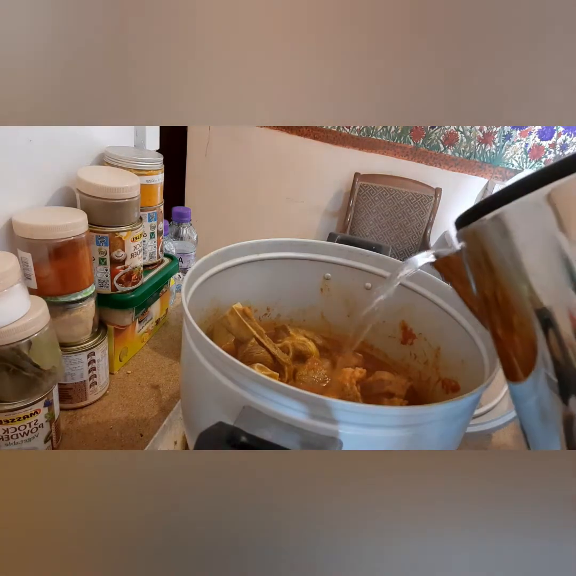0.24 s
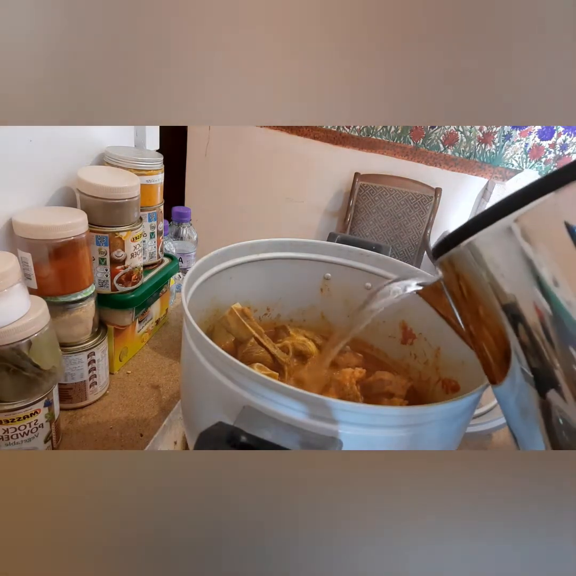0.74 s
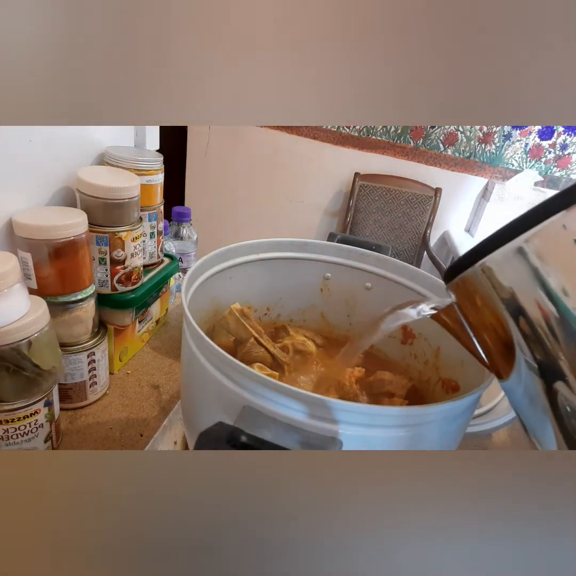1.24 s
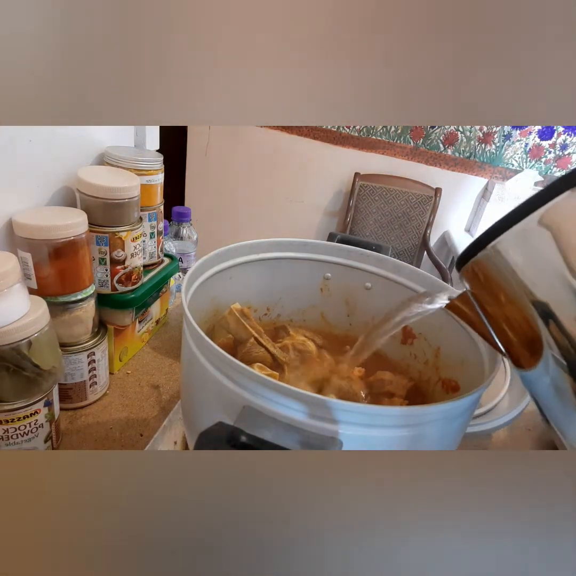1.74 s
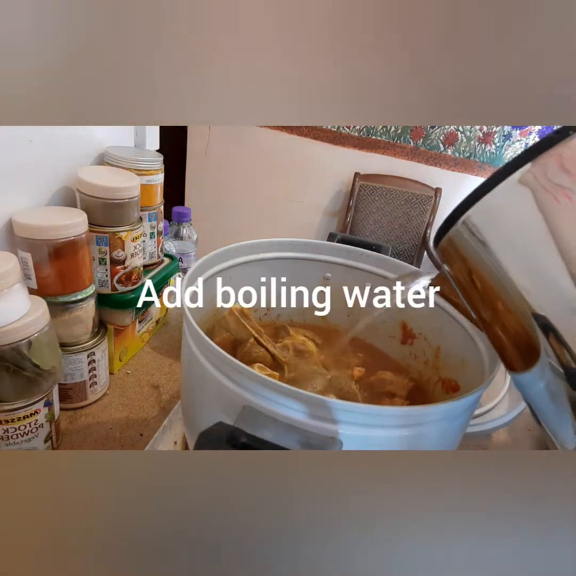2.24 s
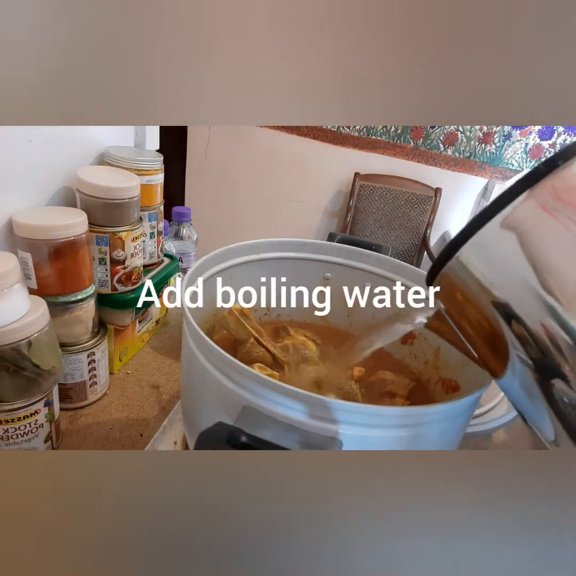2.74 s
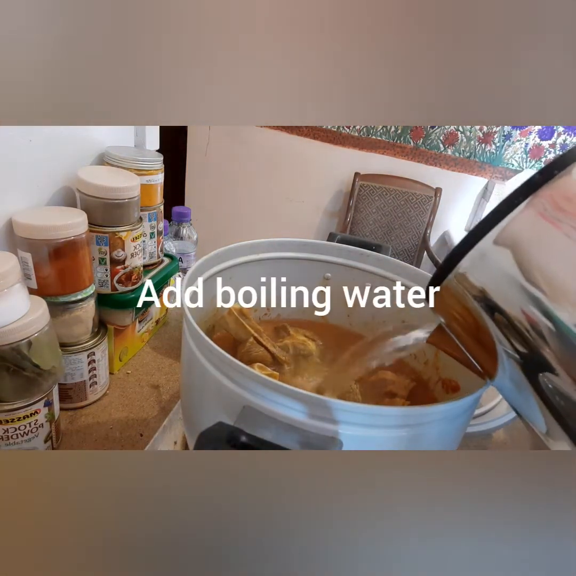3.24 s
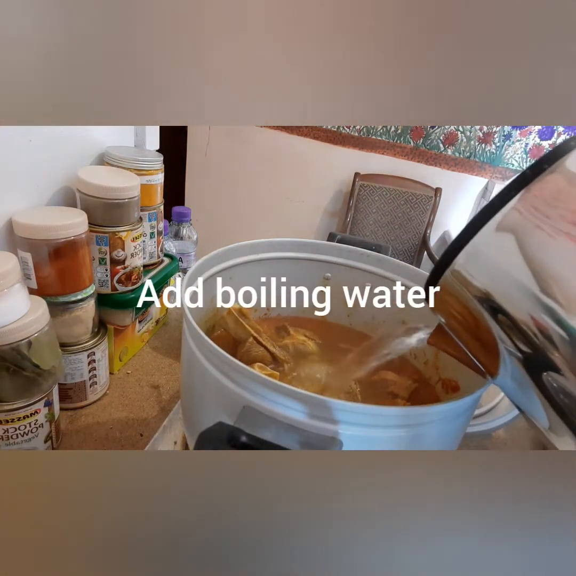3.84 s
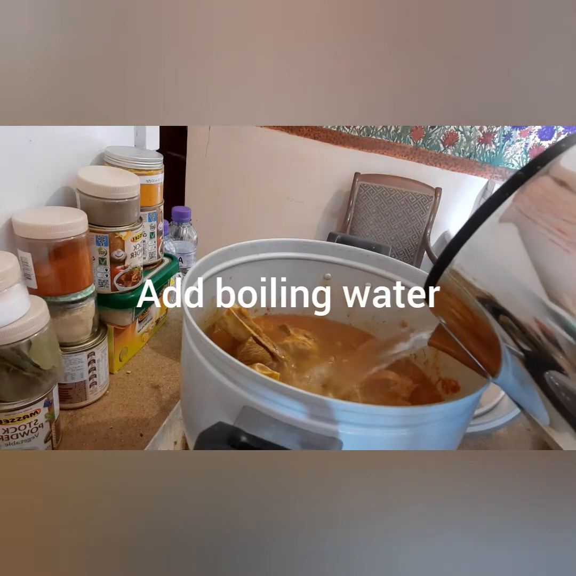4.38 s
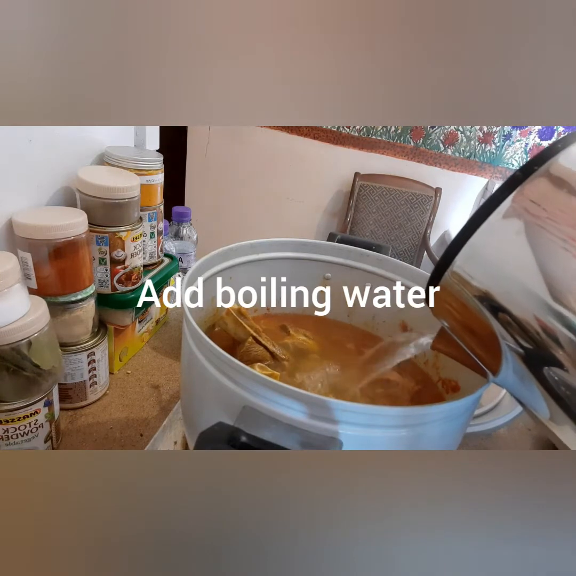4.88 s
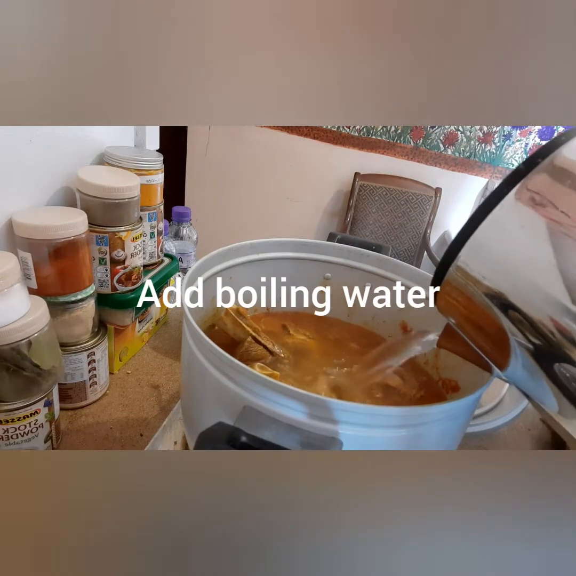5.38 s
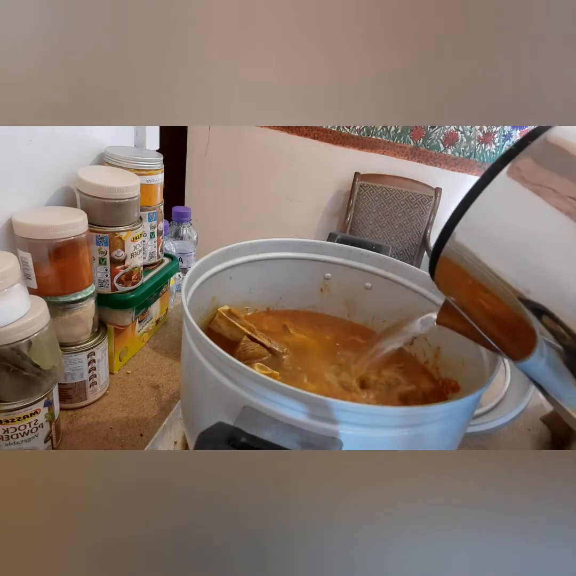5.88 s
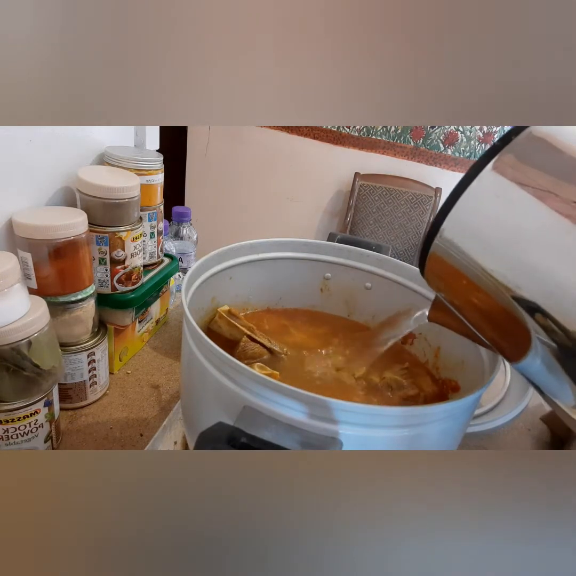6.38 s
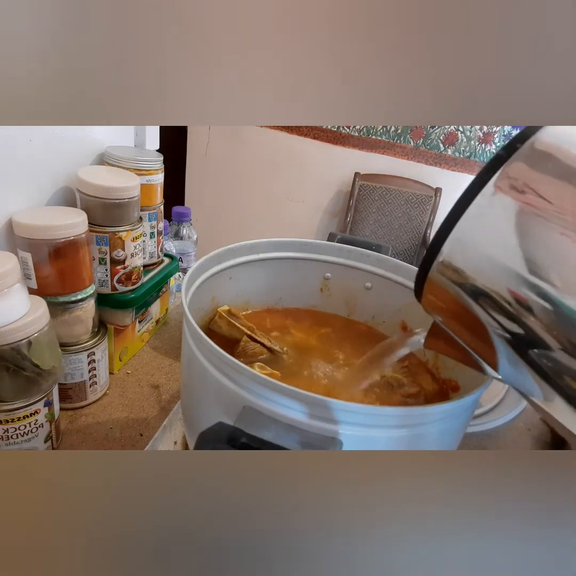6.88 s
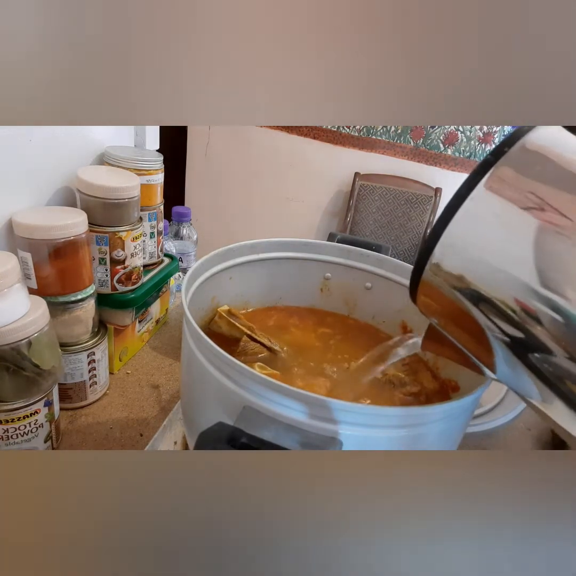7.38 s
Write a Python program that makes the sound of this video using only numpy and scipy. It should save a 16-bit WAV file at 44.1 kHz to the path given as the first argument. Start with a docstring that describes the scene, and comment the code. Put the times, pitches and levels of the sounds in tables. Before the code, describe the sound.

A kettle pours hot water into a wide metal pot of stew, heard very close in stereo in a quiet room with a faint low hush. It opens with a light trickle, and by 0.4 s the stream lands in full with hollow, throaty glugs and a fine hiss, bubbling busily until about 1.7 s. From 1.8 to 2.8 s bright, crisp splashes and spray come to the front. At about 2.9 s a single short, dull knock sounds on the worktop, with deep soft glugs around it until 3.5 s. The pour continues unbroken, with rounded gurgles around 3.6 and 4.5 s and ringing plips. After 5 s the low gurgling thins as the pot fills, leaving a lighter, higher trickle with scattered drips. Spray fades towards the end, though a sharp splash stands out at 7.5 s, the water still running.

```python
"""Gurgling and fine spray over kitchen hush: hot water pours from a kettle into a wide pot of stew.
The stream is swarms of dying, rising sines plus hiss, most of them heard through the pot's resonances.
Glugs and sharp splashes are single bubbles with a noise crack; one knock rings the worktop's modes.
Two ports close by hear the water, with reflections that change as its landing spot wanders."""
import sys
import numpy as np
from scipy import signal
from scipy.fft import rfft, irfft
from scipy.io import wavfile
from scipy.ndimage import uniform_filter1d

SR = 44100
rng = np.random.default_rng(int(sys.argv[2]) if len(sys.argv) > 2 else 0)


def persist_wave(psi):
    """Save psi, clipped to +-1, as 16-bit WAV."""
    counts = np.round(np.clip(psi, -1, 1) * 32767).astype(np.int16)
    wavfile.write(sys.argv[1], SR, np.atleast_2d(counts).T)


N = 336042
T = np.arange(N) / SR
HZ = np.fft.rfftfreq(N, 1 / SR)

# kitchen hush, spectrum shape: (frequency [Hz], level [dB])
HUSH_SPECTRUM = [(18, -39), (30, 28.5), (684, -5.5), (1590, -7), (4190, -36), (16000, -83.5)]
# stream as it wavers and the pot fills: (time [s], gurgle level [dB])
GURGLE_LEVEL = [(0.0, -53.5), (0.45, -57.5), (1.02, -54), (1.19, -54), (1.91, -57), (2.14, -58),
                (3.44, -59.5), (3.63, -53), (4.05, -63), (4.22, -64), (4.52, -53), (5.39, -65),
                (5.77, -65.5), (6.37, -75.5), (6.68, -67.5), (6.9, -66), (7.21, -68.5), (7.62, -66.5)]
# fine spray: (time [s], level [dB])
SPRAY_LEVEL = [(0.0, -62.5), (0.25, -64.5), (0.42, -55), (0.6, -59.5), (1.0, -57.5), (1.72, -58),
               (1.86, -48.5), (2.0, -52), (2.2, -59), (2.53, -46), (2.76, -51.5), (3.25, -58),
               (3.38, -52.5), (3.55, -58), (3.9, -51.5), (4.45, -57.5), (4.9, -52.5), (5.4, -58),
               (5.95, -57), (6.15, -58), (6.95, -61.5), (7.15, -62.5), (7.4, -66), (7.62, -65)]
# mid-sized bubbles that ring the pot: (time [s], level [dB])
RING_LEVEL = [(0.0, -90), (0.33, -97), (0.45, -59), (0.8, -74), (1.1, -61), (1.5, -63), (1.74, -76),
              (1.85, -48), (2.0, -74), (2.38, -75), (2.6, -57.5), (3.25, -59.5), (3.85, -55), (4.1, -62.5),
              (4.5, -60), (4.8, -56), (5.5, -58.5), (5.85, -55.5), (6.15, -62), (7.35, -62.5), (7.62, -71)]
# flurries of bubbles of one size: (middle [s], half-width [s], lift [dB])
SLOSH_FLURRIES = [(0.35, 0.1, 11.4), (0.75, 0.22, 7.9), (2.53, 0.12, 8.9), (3.6, 0.14, 4.3),
                  (4.5, 0.17, 4.9), (6.82, 0.18, 7.1)]
PLOP_FLURRIES = [(0.7, 0.38, 15.5), (2.35, 0.42, 11.5), (3.65, 0.18, 0), (6.25, 0.37, 15.5),
                 (7.35, 0.23, 11)]
SPATTER_FLURRIES = [(0.1, 0.26, -11), (7.12, 0.067, 29), (7.37, 0.07, 20)]
SMALL_FLURRIES = [(1.86, 0.032, 11), (5.75, 0.28, 8.6), (6.45, 0.3, 5.4), (7.3, 0.34, 6)]
MIST_FLURRIES = [(4.55, 0.1, 4.5), (5.8, 0.71, 5.2)]
# whole stream falters briefly: (middle [s], half-width [s], lift [dB])
LULLS = [(1.3, 0.027, -4), (2.88, 0.042, -6.5), (5.37, 0.1, -2.5), (7.24, 0.08, -6.5)]
# large bubbles: (time [s], level [dB], pitch [Hz])
GLUGS = [(0.066, -46.5, 950), (0.13, -47.5, 1005), (0.158, -48, 1015), (0.212, -50, 1030),
         (0.268, -39, 970), (0.386, -30, 474), (0.405, -33.5, 560), (0.435, -33.5, 495), (0.437, -42, 1040),
         (0.487, -39.5, 456), (0.532, -44, 470), (0.573, -38.5, 477), (0.65, -43, 1530), (0.658, -45, 560),
         (0.706, -39.5, 540), (0.708, -33.5, 1440), (0.769, -53, 510), (0.796, -35.5, 497),
         (0.839, -35, 514), (0.858, -33, 674), (0.962, -42, 550), (1.121, -35, 1135), (1.174, -39, 563),
         (1.247, -44.5, 490), (1.371, -35, 560), (1.593, -37.5, 518), (1.61, -36, 520), (1.692, -45, 504),
         (1.721, -48, 482), (2.956, -32.5, 204), (2.985, -46, 190), (3.095, -33.5, 225),
         (3.423, -46.5, 256), (3.475, -35.5, 237), (3.581, -40, 580), (3.686, -43.5, 560),
         (3.713, -40, 640), (3.739, -35.5, 640), (3.927, -45, 530), (4.263, -43.5, 613), (4.318, -38, 646),
         (4.385, -35, 595), (4.433, -48, 580), (4.538, -44, 630), (4.611, -42.5, 597), (4.627, -42, 580),
         (5.108, -46, 580), (5.207, -41.5, 623), (6.255, -46.5, 1094), (6.328, -43.5, 1014),
         (6.796, -45.5, 560), (6.983, -45, 633), (7.059, -47, 584), (7.239, -54, 1170), (7.297, -52.5, 674),
         (7.389, -41.5, 1230), (7.432, -48.5, 570), (7.435, -46, 1170)]
# sharp splashes: (time [s], level [dB], pitch [Hz], crack against bubble [dB])
SPLASHES = [(0.3563, -33, 7080, -5), (0.389, -34.5, 3900, -19), (0.434, -38, 1780, -12),
            (0.534, -37, 13000, -12), (0.5777, -35.5, 2630, -17), (0.838, -25, 8000, -13),
            (1.12, -38, 4520, -30), (1.1398, -31.5, 1780, -13), (1.191, -35, 7500, -17),
            (1.35, -30.5, 7870, -8), (1.696, -34.5, 6900, 7), (1.7796, -28.5, 2010, -6),
            (1.814, -20, 7700, -20), (1.8407, -24, 2920, -12), (1.872, -31.5, 2060, -7),
            (1.9382, -34, 8150, -11), (2.0378, -30.5, 2940, -10), (2.0671, -18.5, 8530, -16.5),
            (2.156, -39, 2800, -10), (2.2, -31, 7900, -8), (2.3416, -33, 6040, -11),
            (2.366, -32, 7900, -16), (2.387, -37, 4850, -10), (2.415, -31.5, 3700, -8),
            (2.4452, -30.5, 6670, -6), (2.515, -24, 8000, -3), (2.527, -27, 9600, -10),
            (2.5518, -28.5, 3140, -16), (2.568, -25.5, 7900, 7), (2.586, -27, 5260, 3),
            (2.661, -22.5, 8100, -13), (2.673, -35, 5270, -8), (2.7656, -30, 2400, -12),
            (2.9265, -36.5, 4500, -16), (3.0952, -31.5, 1940, -13), (3.2232, -39, 1900, -22),
            (3.2597, -35, 2070, -16), (3.333, -42, 1980, -19), (3.3503, -26.5, 5050, 0),
            (3.3718, -24, 3750, -8), (3.509, -38.5, 1940, -2), (3.563, -51, 1920, -13),
            (3.589, -38, 7760, -30), (3.635, -38, 2050, -22), (3.718, -26, 7820, -4),
            (3.7428, -27, 7900, -23.5), (3.7675, -39, 2100, -8), (3.819, -34, 2050, -27),
            (3.861, -32, 1940, 23), (3.9119, -33, 1950, -34), (4.3839, -31.5, 1940, -31),
            (4.406, -36, 2700, -14), (4.43, -29.5, 2160, -14), (4.44, -32, 2730, -11),
            (4.5132, -21.5, 13600, -16), (4.514, -34, 12000, -24), (4.6555, -29.5, 7700, -9),
            (4.6886, -26, 2210, -14.5), (4.785, -32.5, 2070, 19), (4.871, -37, 3570, -20),
            (4.857, -30, 1940, -40), (4.937, -30, 8400, 11), (4.966, -31.5, 1940, 6),
            (5.036, -23, 7500, -17), (5.11, -28.5, 2160, -10), (5.4298, -35, 1970, 18),
            (5.442, -28, 5090, -7), (5.639, -40, 2000, 19), (5.715, -38, 2040, -27),
            (5.777, -50, 1950, -22), (5.9454, -33.5, 1940, 11), (5.964, -27.5, 4400, -11),
            (6.0361, -35.5, 1940, -13), (6.072, -34.5, 2570, -28), (6.2216, -33, 2650, -13),
            (6.322, -28.5, 4610, -17), (6.424, -27, 1940, 26), (6.4506, -33.5, 2670, -49),
            (6.584, -39, 1970, 23), (6.64, -41, 1970, 14), (6.6519, -25.5, 8000, -12),
            (6.74, -34, 2230, -17), (6.7989, -33, 1970, -44), (6.8378, -33, 5200, -8),
            (6.844, -32, 7300, -16), (6.9038, -33, 5600, -8), (6.938, -32, 7500, -16),
            (6.977, -25.5, 3730, -16), (7.06, -29.5, 2000, -10), (7.098, -36.5, 1960, -8),
            (7.115, -39.5, 1960, -19), (7.153, -43.5, 1860, -35), (7.281, -45, 2750, -17),
            (7.308, -47, 1950, -25), (7.347, -41, 1850, -14), (7.358, -39, 1890, -36),
            (7.387, -40.5, 1750, -17), (7.431, -36, 1950, -16), (7.5138, -20, 7540, -14),
            (7.538, -40, 1974, -15), (7.564, -39, 1880, -4), (7.584, -31.5, 2000, -6)]
# the knock: (time [s], level [dB])
KNOCK = 2.9262, -28.5
# worktop modes: (frequency [Hz], level [dB], t60 [s])
WORKTOP_MODES = [(69, -8, 0.37), (105, -7, 0.62), (169.5, 8, 0.31), (350, 7, 0.055), (560, 19.5, 0.016),
                 (726, 18.5, 0.018), (1000, 6, 0.029)]
# pot resonances: (frequency [Hz], width [Hz], level [dB])
POT_RESONANCES = [(135.5, 25, -7.5), (231, 134, -5.5), (504, 52, 0.5), (570.4, 46, -0.5), (646, 443, -4),
                  (1066, 200, -1), (1940, 234, 3.5), (2670, 250, -3.5), (3464, 620, -7), (4484, 350, -9.5),
                  (5450, 540, -10.5), (6290, 870, -8), (6960, 380, -7), (7900, 2060, -0.5)]
# sound that passes between the resonances: (frequency [Hz], level [dB])
POT_DIRECT = [(40, -13), (120, -19), (350, -4.5), (800, -34), (1300, -66), (1600, -23.5), (4000, -3),
              (9500, -3), (16000, 11.5)]
# left-right likeness: (frequency [Hz], shared power [0-1])
PORT_LIKENESS = [(60, 0.63), (150, 0.77), (380, 0.88), (600, 0.78), (950, 0.39), (2380, 0.34), (5980, 0.57),
                 (15000, 0.18)]
# left against right: (frequency [Hz], difference [dB])
PORT_LEAN = [(60, 11), (120, 3.5), (240, 6), (480, -2.5), (950, 4), (1890, 7), (3770, 4), (7520, 5.5),
             (11000, -4.5), (15000, -0.5)]
# phase by which the left port leads: (frequency [Hz], phase [rad])
PORT_LEAD = [(60, 0), (860, 0.6), (2500, 0.2), (5500, 1.4), (8600, 2.6), (11500, 2.0), (14000, 0),
             (16500, 0)]

HUSH_DB, WATER_DB = -70.5, 1.5
USUAL_GURGLE_DB, USUAL_SPRAY_DB = -62, -59
# following layers: level at the lead's usual level [dB], share of its swings, drift [dB/s]
SLOSH_RULE, PLOP_RULE = (-61.5, 0.23, -1.27), (-72.5, 0.099, -0.82)
SPATTER_RULE = (-67.5, 0.17, -3)
SMALL_RULE, MIST_RULE = (-69, 1, 0.4), (-71.5, 1.27, 0.87)
LANDS_S, LANDS_RISE_S, BEFORE_DB = 0.13, 0.11, -16  # mist is held down until the stream lands in full
FILLED_HZ = 560  # the gurgle thins below this as the pot fills
RING_SURGE_DB = 2.3
WOBBLE_DB = 1.5  # shared by all swarms
USUAL_GLUG_DB = -40
SLAP_DB, SLAP_DB_PER_DB = 5.0, 1  # slap against bubble for a usual glug; growth with glug level
SPLASH_LEAN_DB, SPLASH_LATE_S = 2.0, 0.00007  # random left-right spread (rms); longest delay at a port
HIT_ECHO = 0.45  # loud hits are heard more directly than the swarms
ECHO_DECAY_S = 0.004
BASS_CUT_HZ, EDGE_HZ = 77, 16150


def amp(db):
    """dB to gain."""
    return 10 ** (np.asarray(db) / 20)


def evened(x):
    """Scaled to rms 1."""
    return x / np.sqrt(np.mean(x ** 2) + 1e-20)


def read(points, hz):
    """A spectrum table read on a log-frequency axis."""
    f, value = np.transpose(points)
    return np.interp(np.log(hz + 1), np.log(f + 1), value)


def curve(points):
    """A time table as a curve over all samples."""
    s, value = np.transpose(points)
    return np.interp(T, s, value)


def add(mix, s, sound):
    """Mixes a sound in at s seconds."""
    part = mix[..., round(s * SR):][..., :sound.shape[-1]]
    part += sound[..., :part.shape[-1]]


def lifts_db(rows):
    """Sum of bell-shaped level changes in time."""
    return sum(lift_db * np.exp(-((T - s) / width_s) ** 2) for s, width_s, lift_db in rows)


def follow(lead_db, rule, flurries):
    """Level of a layer: a share of its lead's swings, a slow drift and its own flurries."""
    db, share, drift_db_per_s = rule
    return db + share * lead_db + drift_db_per_s * T + lifts_db(flurries)


def wobble():
    """Random surges a few hundredths of a second long, rms 1."""
    return evened(uniform_filter1d(uniform_filter1d(rng.standard_normal(N), 1300), 700))


def pot(hz):
    """Complex response of the pot: steep resonances over a broad direct path."""
    direct = amp(read(POT_DIRECT, hz))
    return direct + sum(amp(db) / (1 + 2j * (hz - f) / width) ** 2.015 for f, width, db in POT_RESONANCES)


def bubble(hz, cycles, glide, phase, rise, sweep=0):
    """A dying sine that rises in pitch as the bubble nears the surface; lengths in cycles."""
    turns = np.arange(int(8 * (cycles + rise) * SR / hz) + 2) * hz / SR
    swell = (1 - np.exp(-turns / rise)) ** 2
    slide = sweep * rise * np.exp(-turns / rise)  # starts flat, reaches pitch as it swells
    angle = turns + slide + glide * turns ** 2 / cycles + phase
    return swell * np.exp(-turns / cycles) * np.sin(2 * np.pi * angle)


def bubbles(lo_hz, hi_hz, per_s, spread_db, cycles, hiss_db, surge_db, inside=True):
    """A surging swarm of bubbles at 14 pitches over hiss, through the pot if inside; rms 1."""
    swarm = np.zeros(N)
    starts = rng.random(N) < per_s / SR
    size = amp(spread_db * np.minimum(rng.exponential(1, N), 3.8))
    kind = rng.integers(0, 14, N)
    for k, hz in enumerate(np.geomspace(lo_hz, hi_hz, 14)):
        one = bubble(hz, cycles, 0.0032, rng.random(), 0.94 * cycles)
        swarm += signal.oaconvolve(size * starts * (kind == k), one)[:N]
    band = 1 / np.sqrt((1 + (lo_hz / (HZ + 1)) ** 16) * (1 + (HZ / hi_hz) ** 16))
    hiss = evened(irfft(rfft(rng.standard_normal(N)) * band, N))
    drive = (evened(swarm) + amp(hiss_db) * hiss) * amp(surge_db * wobble())
    return evened(irfft(rfft(drive) * band * (pot(HZ) if inside else 1), N))


def hush():
    """Kitchen hush: steady shaped noise, independent at the two ports; rms 1."""
    return evened(irfft(rfft(rng.standard_normal((2, N))) * amp(read(HUSH_SPECTRUM, HZ)), N))


def gurgle():
    """Low bubbles that lose their bottom gradually as the pot fills."""
    full = bubbles(384, 917, 200, 5.8, 0.47, -1.1, 2.2)
    thinned = evened(signal.lfilter(*signal.butter(2, FILLED_HZ, "high", fs=SR), full))
    return full + (thinned - full) * T / T[-1]


def mist(high_db):
    """The finest bubbles, held down until the stream lands in full."""
    unlanded_db = BEFORE_DB * np.clip(1 - (T - LANDS_S) / LANDS_RISE_S, 0, 1)
    level_db = follow(high_db, MIST_RULE, MIST_FLURRIES) + unlanded_db
    return amp(level_db) * bubbles(10300, 14500, 1300, 39.0, 1.6, -0.86, 0.33)


def spatter(low_db):
    """Drops on bare food, heard past the pot; drifts down as water covers it, with flurries."""
    level_db = follow(low_db, SPATTER_RULE, SPATTER_FLURRIES)
    return amp(level_db) * bubbles(1180, 2880, 200, 3.5, 1.5, -1.8, RING_SURGE_DB, inside=False)


def ticks(per_s, spread_db, lo_hz):
    """Fine droplets burst as bare broad clicks; rms 1."""
    size = amp(spread_db * np.minimum(rng.exponential(1, N), 4))
    click = rng.standard_normal(60) * np.exp(-T[:60] / 0.00021)
    clicks = signal.oaconvolve(size * (rng.random(N) < per_s / SR), click)[:N]
    return evened(signal.lfilter(*signal.butter(2, lo_hz, "high", fs=SR), clicks))


def stream():
    """Swarms from large and slow to fine, at their own levels or following gurgle or spray."""
    gurgle_db, spray_db = curve(GURGLE_LEVEL), curve(SPRAY_LEVEL)
    low_db, high_db = gurgle_db - USUAL_GURGLE_DB, spray_db - USUAL_SPRAY_DB
    slosh_db = follow(low_db, SLOSH_RULE, SLOSH_FLURRIES)
    plop_db = follow(low_db, PLOP_RULE, PLOP_FLURRIES)
    small_db = follow(high_db, SMALL_RULE, SMALL_FLURRIES)
    # bubbles: lo_hz, hi_hz, per_s, spread_db, cycles, hiss_db, surge_db
    swarms = amp(slosh_db) * bubbles(66.0, 433, 150, 3.5, 0.82, 0.33, 0.91)
    swarms += amp(gurgle_db) * gurgle()
    swarms += amp(plop_db) * bubbles(863, 1390, 220, 1.6, 1.56, 2.5, 5.3)
    swarms += spatter(low_db)
    swarms += amp(curve(RING_LEVEL)) * bubbles(1788, 2347, 330, 4.7, 2.74, -2.2, RING_SURGE_DB)
    swarms += amp(small_db) * bubbles(2533, 3090, 300, 3.3, 2.55, 0.43, RING_SURGE_DB)
    swarms += amp(spray_db) * bubbles(3520, 10460, 3000, 6.2, 1.67, -7.0, 2.08)
    swarms += mist(high_db)
    swarms += amp(spray_db - 15.0) * ticks(130, 5.1, 2530)
    return swarms * amp(WOBBLE_DB * wobble() + lifts_db(LULLS))


def burst(hz, cycles, crack_db, crack_s, lo_hz, hi_hz, fizz_db, direct, rise, sweep=0):
    """One loud bubble with a short broad crack, fizzing tail and pot-wall echo; peak 1."""
    t, noise = T[:4096], rng.standard_normal(4096)
    fade = amp(crack_db) * np.exp(-t / crack_s) + amp(fizz_db) * np.exp(-t / 0.045)
    crack = fade * noise * (1 - np.exp(-t / 0.001)) ** 2
    sound = signal.lfilter(*signal.butter(2, [lo_hz, hi_hz], "band", fs=SR), crack)
    add(sound, 0, bubble(hz, cycles, 0.012, 0, rise * cycles, sweep))
    past_pot = direct * sound
    add(sound, 0.0017, 0.23 * sound.copy())  # wall echo
    sound = irfft(rfft(sound) * pot(np.fft.rfftfreq(4096, 1 / SR))) + past_pot
    return sound / abs(sound).max()


def glugs(mix):
    """Large bubbles; smaller ones ring for more cycles, louder ones slap the surface harder."""
    for s, db, hz in GLUGS:
        slap_db = SLAP_DB + SLAP_DB_PER_DB * (db - USUAL_GLUG_DB)
        cycles = 3.1 * hz / 670.0
        sound = burst(hz, cycles, slap_db, 0.0023, 546, 1700, fizz_db=-10.0, direct=1.0, rise=0.28)
        add(mix, s, amp(db) * sound[None])


def splashes(mix):
    """Sharp bubbles that slide up to pitch, each a little left or right in level and delay."""
    for s, db, hz, crack_db in SPLASHES:
        lean = amp(SPLASH_LEAN_DB * rng.standard_normal() * np.array([[.5], [-.5]]))
        cycles = 2.85 * (hz / 2600.0) ** 0.47
        sound = amp(db) * lean * burst(hz, cycles, crack_db, 0.0019, 1900, 9750, fizz_db=-35.5,
                                       direct=0.32, rise=1.14, sweep=0.15)
        for port, late_s in enumerate(SPLASH_LATE_S * rng.random(2)):
            add(mix[port], s + late_s - 0.0005, sound[port])


def knock():
    """A blow and a rough rattle after it ring the worktop; peak 1."""
    t = T[:9000]
    modes = sum(amp(db - 60 * t / t60) * np.sin(2 * np.pi * hz * t) for hz, db, t60 in WORKTOP_MODES)
    blows = amp(-21.5) * rng.standard_normal(len(t)) * np.exp(-t / 0.031)
    blows[0] = 1
    sound = signal.fftconvolve(blows, modes)[:len(t)]
    return sound / abs(sound).max()


def ports(x, echoed):
    """Direct sound plus close reflections that change as the landing spot wanders among 5 places."""
    scatter = rng.standard_normal((5, 2, 1200)) * np.exp(-T[:1200] / ECHO_DECAY_S)
    scatter = rfft(scatter - scatter.mean(0), N)  # on average no side is favoured
    scatter /= np.sqrt(uniform_filter1d(abs(scatter) ** 2, 3000, axis=2))  # no broad colour of their own
    drift = uniform_filter1d(uniform_filter1d(rng.standard_normal((5, 1, N)), 300), 300)
    share = np.exp(17.0 * evened(drift))  # mostly one place at a time
    share /= np.sqrt((share ** 2).sum(0))
    same, side = np.clip(read(PORT_LIKENESS, HZ), 0, 1), np.array([[.5], [-.5]])
    reflected = (rfft(share * echoed) * scatter).sum(0)
    heard = np.sqrt(same) * rfft(x) + np.sqrt(1 - same) * reflected
    lean = amp(side * read(PORT_LEAN, HZ))
    return irfft(heard * lean * np.exp(1j * side * read(PORT_LEAD, HZ)), N)


def scene():
    """Water and knock at the ports, over the hush of the kitchen."""
    air, water, hits = hush(), stream(), np.zeros((2, N))
    glugs(hits)
    splashes(hits)
    knock_s, knock_db = KNOCK
    add(hits, knock_s, amp(knock_db) * knock()[None])
    return amp(WATER_DB) * ports(water + hits, water + HIT_ECHO * hits) + amp(HUSH_DB) * air


def record(dry):
    """The microphone loses the deep bass; then the band limit."""
    thin = signal.lfilter(*signal.butter(2, BASS_CUT_HZ, "high", fs=SR), dry)
    lowpass = signal.firwin(255, EDGE_HZ, window=("kaiser", 7), fs=SR)
    return signal.oaconvolve(thin, lowpass[None], "same")


dry = scene()
out = record(dry)
persist_wave(out)
```